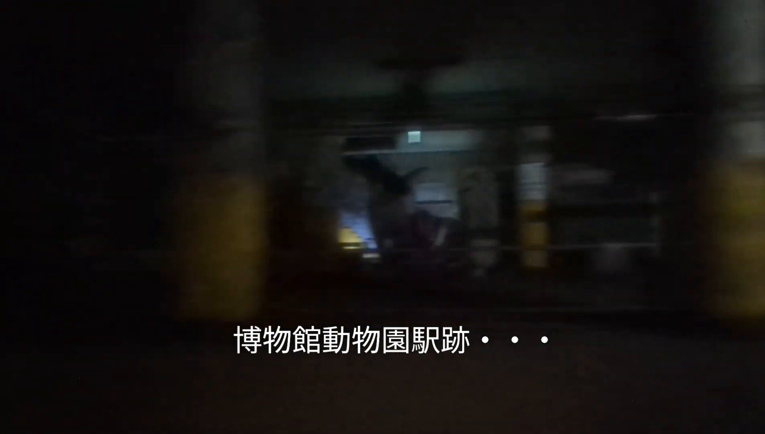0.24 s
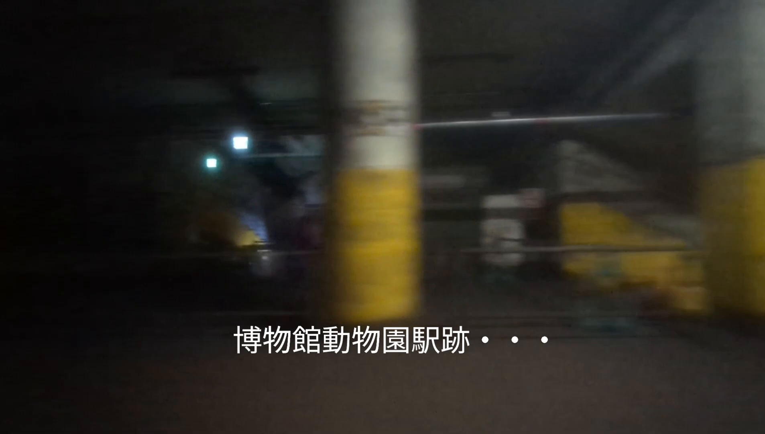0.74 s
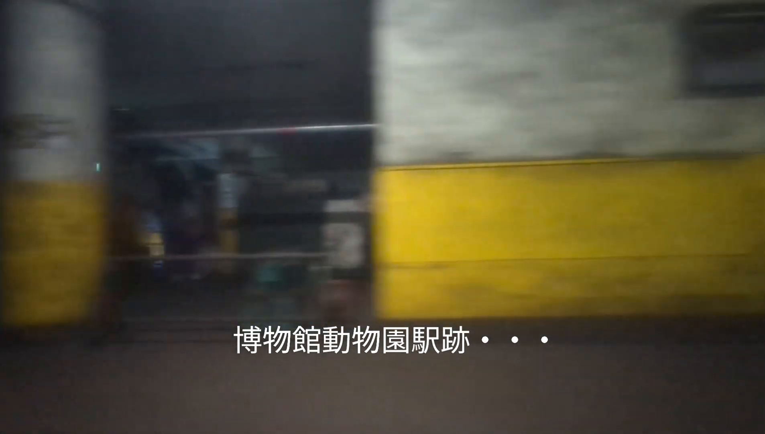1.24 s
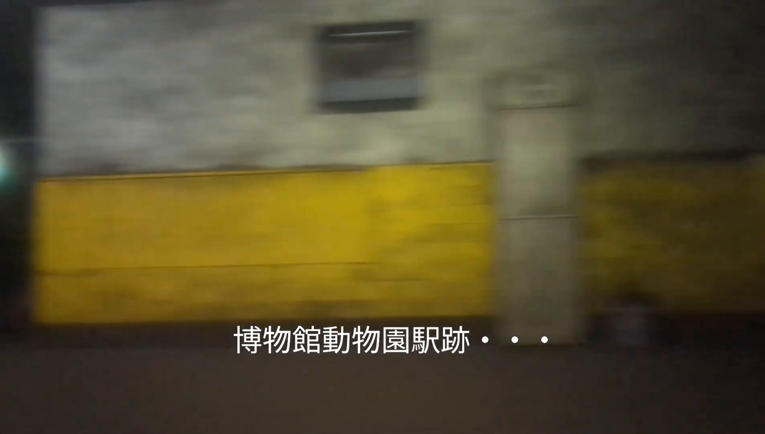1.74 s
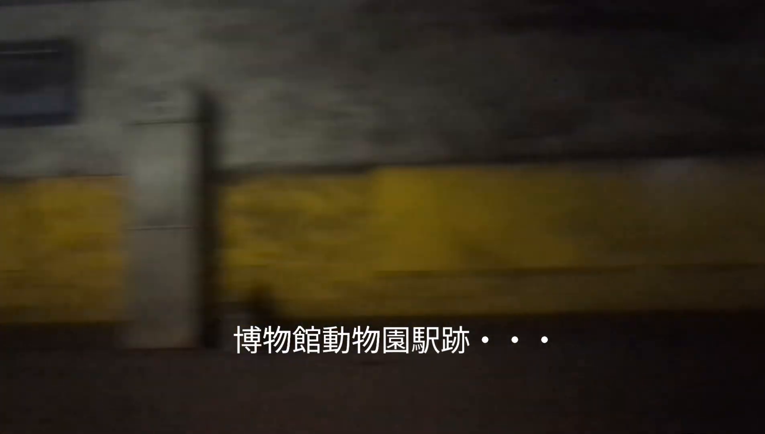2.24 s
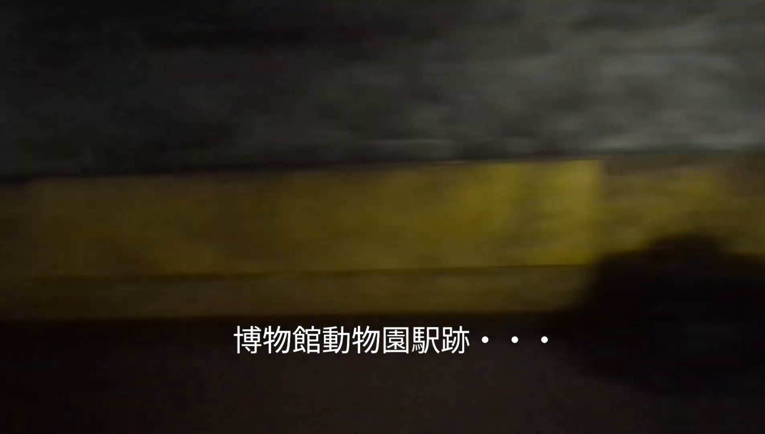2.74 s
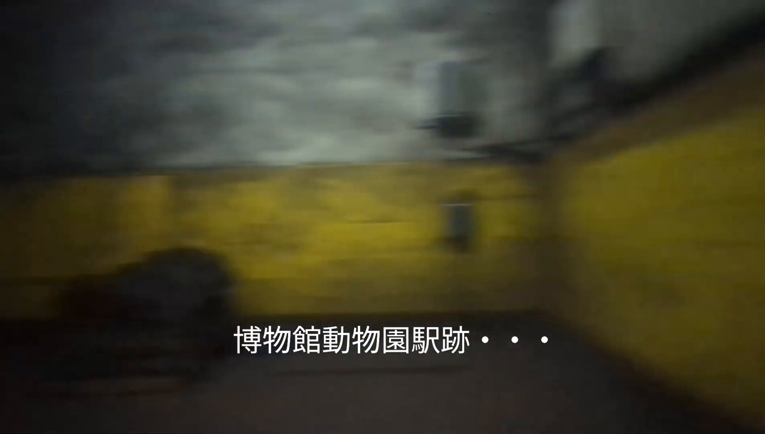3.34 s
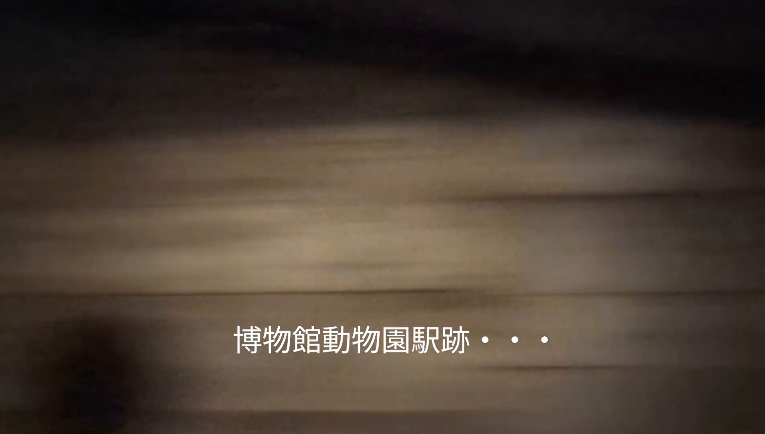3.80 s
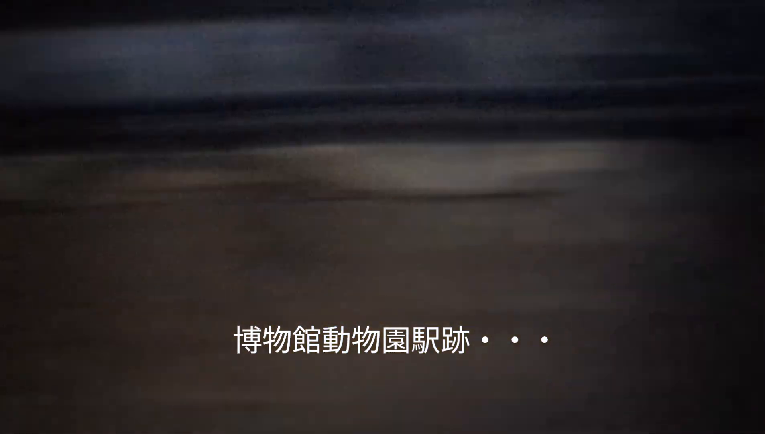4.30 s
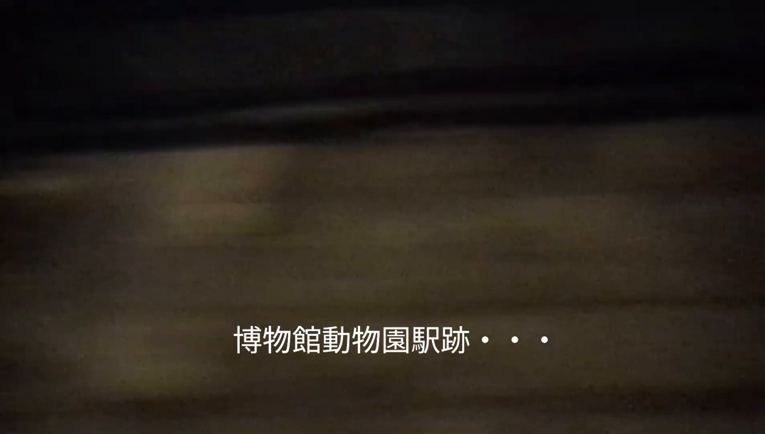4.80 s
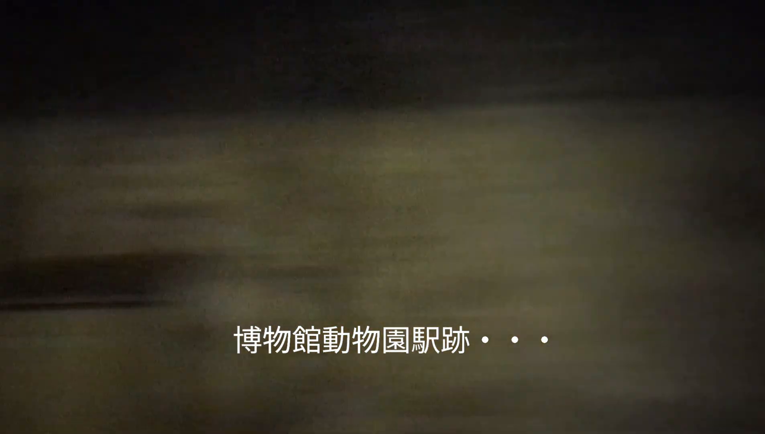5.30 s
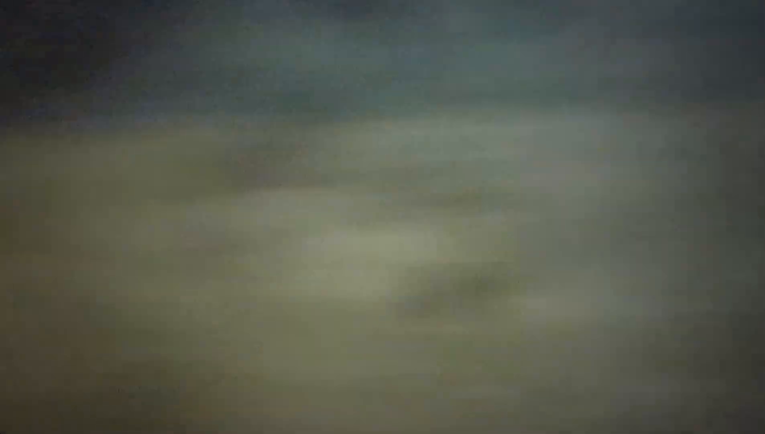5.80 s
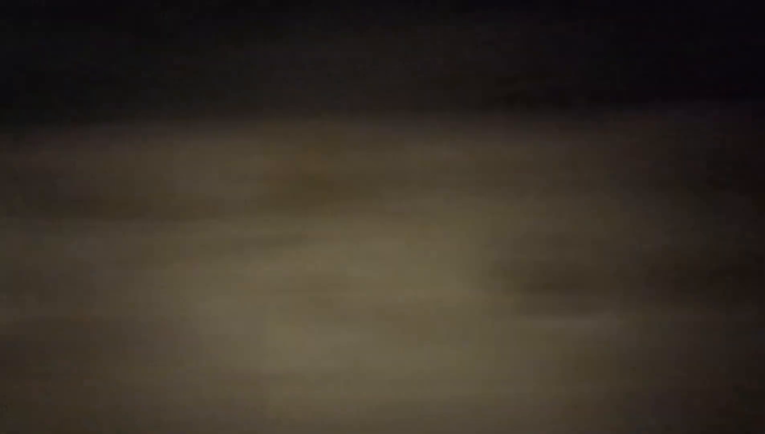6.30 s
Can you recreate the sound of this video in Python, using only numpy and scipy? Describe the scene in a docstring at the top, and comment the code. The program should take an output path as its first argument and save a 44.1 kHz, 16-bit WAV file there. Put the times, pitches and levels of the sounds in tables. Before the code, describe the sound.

Heard by the window inside an underground train car, a deep boom throbs and wavers under steady wheel rumble and mid roar. Around two seconds a cluster of thumps and rail-joint clatter surges with a hissing rush. It settles, then grows rougher, with drumming floor, tiny trim ticks and two strong clattering joints near the end. Close, enclosed stereo, bass-heavy with very little treble.

```python
"""Train car in a tunnel

The car body booms as a low tone that swells and wavers in pitch, in wider noise.
The wheels rumble, roar and hiss as shaped noise.
Rail joints crack, ping and clatter; bumps thump, the floor drums and wheel flanges squeal briefly.
Bright hiss returns from the tunnel wall, and loose trim crackles and ticks faintly.
Noise layers follow level curves or event times and are spread over two ears."""
import sys
import numpy as np
from scipy import signal
from scipy.fft import rfft, irfft, next_fast_len
from scipy.io import wavfile
from scipy.ndimage import uniform_filter1d

SR = 44100
rng = np.random.default_rng(int(sys.argv[2]) if len(sys.argv) > 2 else 0)


def master_out(mix):
    """Clip the mix to full scale and print it as 16-bit PCM to the path in sys.argv[1]."""
    frames = np.transpose(np.atleast_2d(mix))
    ceiling = np.clip(frames, -1, 1)
    pcm = np.round(ceiling * 32767).astype(np.int16)
    wavfile.write(sys.argv[1], SR, pcm)


N = 288833
TIME = np.arange(N) / SR
FFT_SIZE = next_fast_len(N, True)
FREQS = np.maximum(np.fft.rfftfreq(FFT_SIZE, 1 / SR), 1)
# rough, uneven contact makes rolling noise and clatter grainy (rms dB, rate)
GRIT_DB, GRITS_PER_S = 1.5, 90

# body shake on the springs, before tone and noise offsets: time_s, level_db
BODY_SHAKE = [(0, -22.5), (0.55, -22), (0.77, -25.5), (0.97, -21.5), (1.85, -23), (2.0, -29.5), (2.17, -20),
              (2.5, -22.5), (2.98, -25.5), (3.15, -20.5), (3.29, -21.5), (3.45, -19.5), (4.05, -19.5),
              (4.75, -21), (5.1, -20), (5.6, -20.5), (6.2, -20), (6.5, -20)]
# resonances and dead spots of the car's panels: centre_hz, width_hz, lift_db
PANEL_MODES = [(104, 6.6, -0.5), (119, 33, 4.5), (141, 16, 0), (167, 9.6, -4.5), (200.7, 32, 4.5),
               (242, 14, -2.5), (379, 21, -3.5), (410.5, 15, 4.5), (475, 7.8, -2.5), (494.4, 44, 6.5),
               (504, 20, -1), (560.7, 18, 6.5), (670, 52, 4), (787, 8.8, 4.5), (890, 40, -5.5),
               (920, 32, 3), (1229, 59, 4.5), (1330, 50, 7), (1505, 42, -2), (1534, 85, 3), (1800, 210, 0),
               (1976, 78, -5.5)]


def from_db(db):
    """Decibels to gain."""
    return 10 ** (np.asarray(db) / 20)


def rms_one(x):
    """Scale to an rms of 1."""
    return x / np.sqrt(np.mean(x ** 2) + 1e-20)


def in_time(rows):
    """Each column of a curve, interpolated at every sample."""
    s, *columns = np.transpose(rows)
    return [np.interp(TIME, s, column) for column in columns]


def over_hz(points):
    """(Hz, value) points joined on a log-frequency axis."""
    hz, value = np.transpose(points)
    return np.interp(np.log(FREQS), np.log(hz), value)


def colour(spectrum, resonances=()):
    """Gain of a spectrum that falls steeply past its ends, lifted at each resonance."""
    lift_db = sum(db / (1 + (2 * (FREQS - hz) / width_hz) ** 2) for hz, width_hz, db in resonances)
    lowest_hz, highest_hz = spectrum[0][0], spectrum[-1][0]
    skirts = np.minimum(1, np.minimum(FREQS / lowest_hz, highest_hz / FREQS)) ** 4
    return from_db(over_hz(spectrum) + lift_db) * skirts


def in_car(forces, gain):
    """Two unrelated forces through a colour: long waves reach both ears alike, short ones diffusely."""
    # sound field: pitch_hz, left_right_correlation
    likeness = [(60, .987), (130, .955), (260, .93), (330, .75), (460, .12), (630, .48), (900, .06),
                (1200, -.05), (1370, -.5), (1680, .35), (2100, .02), (5000, .05), (9000, .4)]
    # sound field: pitch_hz, left_minus_right_db
    balance = [(110, 0.6), (200, 0), (350, 1.5), (440, 3), (600, -0.5), (900, 1), (1420, 6.5), (1900, 0),
               (2400, -0.5), (2800, 6), (3500, -1.5), (9000, -1)]
    mid, side = rfft(forces, FFT_SIZE) * gain
    alike = np.clip(over_hz(likeness), -.999, .999)
    sign = np.array([[1], [-1]])  # left, right
    ears = np.sqrt(1 + alike) * mid + sign * np.sqrt(1 - alike) * side
    ears = ears * from_db(sign * over_hz(balance) / 2)
    return irfft(ears, FFT_SIZE)[:, :N]


def rolling(spectrum, resonances=()):
    """Vibration driven by random roughness: coloured noise in both ears, rms 1."""
    return rms_one(in_car(rng.standard_normal((2, N)), colour(spectrum, resonances)))


def evened(x, span_s):
    """The same vibration with its swells slower than span_s taken out."""
    power = uniform_filter1d(np.mean(x ** 2, axis=0), max(int(span_s * SR), 1))
    return x / np.sqrt(power + 1e-9)


def drift(per_s):
    """A smooth random wander, rms 1, with little movement faster than per_s."""
    spectrum = rfft(rng.standard_normal(N), FFT_SIZE) * np.exp(-(FREQS / per_s) ** 2)
    return rms_one(irfft(spectrum, FFT_SIZE)[:N])


def grit():
    """Random gain of grainy contact."""
    return from_db(GRIT_DB * drift(GRITS_PER_S))


def blow(start_s, rise_s, t60_s):
    """Envelope of a blow: a quick rise, then an exponential decay."""
    age_s = np.maximum(TIME - start_s, 0)
    return (1 - np.exp(-age_s / rise_s)) * from_db(-60 * age_s / t60_s)


def swells(rows):
    """Sum of bell-shaped swells: centre_s, half_width_s, level_db."""
    return sum(from_db(db) * np.exp(-((TIME - s) / width_s) ** 2) for s, width_s, db in rows)


def body_boom():
    """The car's lowest resonance: a low tone throbs, swells and wavers in pitch, in wider noise."""
    # swells of the low tone, levels before swell_db: centre_s, crest_db, half_width_s, pitch_hz
    boom_swells = [(0.309, -21, 0.022, 67.83), (0.49, -21.5, 0.054, 60.3), (0.68, -19.5, 0.016, 66.2),
                   (0.86, -14.5, 0.024, 56.63), (1.15, -16, 0.013, 66.5), (1.329, -18.5, 0.034, 56.9),
                   (1.42, -19.5, 0.022, 62.55), (1.55, -20, 0.069, 54.7), (1.72, -18, 0.023, 59.6),
                   (1.9, -18.5, 0.022, 58.46), (2.101, -16, 0.038, 60), (2.3, -21, 0.053, 71.8),
                   (2.5, -22, .045, 65.8), (3.2, -18, 0.028, 72.3), (3.36, -18.5, 0.026, 63.41),
                   (3.44, -15.5, 0.036, 60.1), (3.54, -14.5, 0.025, 57), (3.64, -14, 0.028, 54.8),
                   (3.75, -17.5, .02, 67.04), (3.85, -18, 0.04, 59.8), (4.04, -18, 0.07, 59.96),
                   (4.22, -17.5, 0.022, 69.8), (4.44, -20, 0.029, 66), (4.61, -15.5, 0.024, 62.9),
                   (4.925, -16, 0.059, 64), (5.07, -18, 0.027, 69.4), (5.21, -15.5, 0.044, 67),
                   (5.399, -18, 0.028, 66), (5.48, -16, 0.019, 68), (5.57, -17, 0.05, 58.7),
                   (5.72, -14, 0.027, 62.35), (5.88, -17.5, 0.039, 62.98), (6.04, -20.5, 0.031, 61),
                   (6.18, -18.5, 0.034, 67.6), (6.3, -23.5, 0.033, 62)]
    # noise around the tone: pitch_hz, relative_db per Hz
    boom_spectrum = [(22, -32.5), (31, -27.5), (40, -11.5), (51, 1), (61, -13), (70, -7), (80, -2),
                     (97, -6), (110, -22), (170, -48.5)]
    tone_db, swell_db, noise_db = -6.0, 1.3, -4
    throb_db, throbs_per_s = 2.5, 7.6
    throb_limit_db = 10.5  # upper limit of the random throb, hardly ever reached
    wander_hz, wanders_per_s = 1.201, 3.17
    lowest_hz, highest_hz = 35, 100

    shake_db, = in_time(BODY_SHAKE)
    sway = from_db(shake_db + np.minimum(throb_db * drift(throbs_per_s), throb_limit_db))
    swell = swells([(s, width_s, db) for s, db, width_s, _ in boom_swells])
    pitch_hz = in_time(boom_swells)[-1] + wander_hz * drift(wanders_per_s)
    tone = np.sqrt(2) * np.sin(2 * np.pi * np.cumsum(pitch_hz) / SR)
    boom = np.maximum(from_db(tone_db) * sway, from_db(swell_db) * swell) * tone
    boom = boom + from_db(shake_db + noise_db) * evened(rolling(boom_spectrum), span_s=0.11)
    # panels radiate little on either side of the resonance
    radiation = 1 / np.sqrt((1 + (lowest_hz / FREQS) ** 8) * (1 + (FREQS / highest_hz) ** 16))
    return irfft(rfft(boom, FFT_SIZE) * radiation, FFT_SIZE)[:, :N]


def wheels():
    """Rolling noise of wheel on rail: floor rumble, mid roar and the hiss of ringing steel."""
    # rail roughness heard as levels: time_s, roar_db, hiss_db
    track = [(0, -41, -69), (0.25, -39, -64), (0.55, -39.5, -65.5), (0.78, -40.5, -66.5), (1.6, -41, -66.5),
             (1.93, -36.5, -61), (2.05, -40, -62), (2.27, -35, -54), (2.44, -39, -57.5),
             (2.72, -41.5, -64.5), (2.82, -39.5, -60), (3.5, -39, -63), (3.99, -36, -55.5),
             (4.12, -38.5, -61), (4.28, -37.5, -54), (4.55, -38.5, -60), (4.9, -37.5, -59),
             (5.03, -36, -52), (5.2, -37.5, -57.5), (5.7, -36.5, -56.5), (5.98, -38, -57),
             (6.5, -40, -59.5)]
    # spectra: pitch_hz, relative_db per Hz
    rumble_spectrum = [(80, -22.5), (125, -1), (165, -1.5), (210, -1.5), (310, -0.5), (380, -4.5),
                       (520, -6.5), (650, -13.5), (850, -27), (1500, -53)]
    roar_spectrum = [(400, -24.5), (700, 0), (950, 4), (1150, -2.5), (1500, -4), (1850, -2), (2100, -9.5),
                     (2600, -19), (3200, -24), (5000, -52.5)]
    hiss_spectrum = [(1800, -12), (2600, 0), (3200, 0.5), (3900, -4), (4130, -6), (4500, -10.5),
                     (5300, -11.5), (5900, -25), (6800, -24.5), (7600, -28.5), (12000, -34.5)]
    # ringing of wheels and rails: centre_hz, width_hz, lift_db
    steel_modes = [(3250, 66, -7), (3490, 190, 4.5), (3650, 45, 8.5), (3940, 92, 5), (4300, 59, -4),
                   (4306, 68, 10.5), (4800, 140, 2.5)]
    usual_roar_db, usual_boom_db, usual_rumble_db = -39, -22, -30  # on ordinary track
    rumble_per_roar, rumble_per_boom = 1, 0.12  # dB per dB
    flaw_db, flaws_per_s = 0.77, 6.9  # small rail flaws swell all three layers together

    roar_db, hiss_db = in_time(track)
    shake_db, = in_time(BODY_SHAKE)
    rumble_db = usual_rumble_db + rumble_per_roar * (roar_db - usual_roar_db)
    rumble_db = rumble_db + rumble_per_boom * (shake_db - usual_boom_db)
    rumble = from_db(rumble_db) * evened(rolling(rumble_spectrum, PANEL_MODES), span_s=0.27)
    roar = from_db(roar_db) * evened(rolling(roar_spectrum, PANEL_MODES), span_s=0.26)
    hiss = from_db(hiss_db) * rolling(hiss_spectrum, steel_modes) * grit()
    return (rumble + roar + hiss) * from_db(flaw_db * drift(flaws_per_s))


def roar_surges():
    """The wheels' roar swells into a hollow, grainy rush and sinks back."""
    # centre_s, half_width_s, level_db
    surges = [(1.93, 0.044, -37.5), (2.29, 0.09, -36), (5.05, 0.062, -38), (6.09, 0.062, -41.5)]
    # pitch_hz, relative_db per Hz
    surge_spectrum = [(600, -5), (950, 5), (1500, -3.5), (1900, -10.5), (2400, -19.5), (3300, -26.5),
                      (4300, -23), (5500, -35)]
    # panel resonance excited: centre_hz, width_hz, lift_db
    surge_modes = [(1270, 120, 9.3)]
    return swells(surges) * grit() * evened(rolling(surge_spectrum, surge_modes), span_s=0.06)


def rail_joints():
    """Wheels on joints: a steel crack and ping, a ringing floor and a swelling clatter."""
    # start_s, clatter_db, crack_db, floor_ring_db, clatter_rise_s, clatter_t60_s, crack_t60_s, ping_hz
    joints = [(2.105, -32.5, -51.5, -22.5, .012, 0.4, 0.18, 2330),
              (2.2, -30, -66, -42, 0.035, 0.33, 0.3, 2300),
              (5.708, -25.5, -41.5, -35, 0.027, 0.44, 0.37, 3058),
              (6.034, -24.5, -37, -33, 0.024, 0.61, 0.46, 3207)]
    # spectra: pitch_hz, relative_db per Hz
    clatter_spectrum = [(300, -20.5), (650, 10.5), (1300, 1.5), (2000, 1), (2700, -14.5), (3500, -13.5),
                        (5000, -34.5), (8000, -36.5), (15000, -50)]
    crack_spectrum = [(1600, -13), (2150, 4.5), (2650, -4), (3400, -10.5), (5000, -19.5), (8000, -33),
                      (15000, -53.5)]
    ring_spectrum = [(430, -25), (480, -14.5), (520, 4), (555, -5.5), (620, -5)]
    crack_rise_share = 0.22  # of the clatter's rise time
    ping_db = 4  # relative to crack_db

    clatter = crack = ring = pings = 0
    for s, clatter_db, crack_db, ring_db, rise_s, clatter_t60_s, crack_t60_s, ping_hz in joints:
        clatter += from_db(clatter_db) * blow(s, rise_s, clatter_t60_s)
        crack += from_db(crack_db) * blow(s, crack_rise_share * rise_s, crack_t60_s)
        ring += from_db(ring_db) * blow(s, rise_s=0.02, t60_s=0.43)
        pings += from_db(crack_db + ping_db) * rail_ping(s, ping_hz)
    clatter = grit() * clatter * rolling(clatter_spectrum, PANEL_MODES)
    crack = crack * rolling(crack_spectrum)
    ring = ring * evened(rolling(ring_spectrum), span_s=0.04)
    return clatter + crack + pings + ring


def rail_ping(start_s, start_hz):
    """High bending waves run fastest along the rail, so a blow arrives as a short falling ping."""
    octave_s, blur_hz = .045, 72  # time to fall the first octave; rms pitch unsteadiness
    age_s = np.maximum(TIME - start_s, 0)
    pitch_hz = start_hz / (1 + age_s / octave_s) + blur_hz * drift(270)
    return blow(start_s, rise_s=0.0074, t60_s=0.069) * np.sin(2 * np.pi * np.cumsum(pitch_hz) / SR)


def bumps():
    """Dips in the track thump dully through the suspension."""
    # start_s, level_db
    heavy_bumps = [(0.601, -24.5), (1.81, -19), (1.94, -27), (2.16, -25.5), (2.212, -18.5), (2.288, -22.5),
                   (2.535, -26), (3.6, -22.5), (4.229, -25), (4.581, -24), (5.0, -27), (5.13, -23.5),
                   (5.595, -20), (5.801, -23.5)]
    # pitch_hz, relative_db per Hz
    thump_spectrum = [(110, -4), (145, -7), (205, -2), (290, -9), (400, -13.5), (700, -34.5)]
    push = sum(from_db(db) * blow(s, rise_s=0.015, t60_s=0.49) for s, db in heavy_bumps)
    return push * evened(rolling(thump_spectrum, PANEL_MODES), span_s=0.059)


def floor_drumming():
    """Short rough patches of rail make the floor panels drum in swells."""
    # centre_s, half_width_s, level_db
    rough_patches = [(0.58, 0.075, -34), (1.87, 0.054, -35), (2.28, .08, -35.5), (2.81, 0.073, -35.5),
                     (3.83, 0.046, -29.5), (3.99, 0.04, -37), (4.24, 0.057, -34), (5.13, 0.13, -35.5),
                     (5.33, 0.031, -27.5), (5.51, 0.034, -33), (5.679, 0.071, -33), (5.85, 0.07, -33.5),
                     (6.04, 0.078, -33)]
    # pitch_hz, relative_db per Hz
    drum_spectrum = [(330, -18), (420, -4.5), (520, 3.5), (620, -5), (760, -5.5)]
    return swells(rough_patches) * evened(rolling(drum_spectrum, PANEL_MODES), span_s=0.016)


def flange_squeals():
    """A flange rubs the rail and a wheel mode swells up: narrow noise whistles, broad noise scrapes."""
    # one row per squeal: centre_s, length_s, pitch_hz, width_hz, level_db
    squeals = [(0.562, .04, 3700, 59, -64), (1.91, .12, 3700, 500, -63), (2.266, 0.15, 3700, 380, -56),
               (2.845, 0.17, 3995, 45, -64.5), (2.82, .16, 3400, 70, -65.5), (3.115, 0.11, 3980, 45, -64),
               (3.18, 0.13, 3460, 80, -65), (4.879, 0.019, 3440, 30, -52), (5.035, .2, 3700, 600, -61),
               (5.02, .14, 4270, 90, -61)]
    out = np.zeros((2, N))
    for s, length_s, hz, width_hz, db in squeals:
        swell = np.cos(np.pi * np.clip((TIME - s) / length_s, -.5, .5))
        resonance = 1 / (1 + (2 * (FREQS - hz) / width_hz) ** 2)
        mode = in_car(rng.standard_normal((2, N)), resonance)
        out += from_db(db) * swell * evened(rms_one(mode), span_s=.02)
    return out


def wall_echo():
    """The tunnel wall closes in and draws back, returning bright wheel hiss to the window."""
    # pitch_hz, relative_db per Hz
    wall_spectrum = [(1800, -14.5), (2200, 1.5), (2700, 2), (3200, -18.5), (4200, -21), (5200, -20),
                     (5900, -28.5), (6800, -22), (7600, -36)]
    nearest_s, nearest_db = 5.75, -53.5
    rise_db_per_s, fall_db_per_s = 16.5, 4
    past_s = TIME - nearest_s
    loss_db = np.maximum(-rise_db_per_s * past_s, fall_db_per_s * past_s)
    return from_db(nearest_db - loss_db) * rolling(wall_spectrum)


def trim_chatter():
    """Loose fittings crackle with clumps of tiny contacts of uneven size."""
    # crackle level: time_s, level_db
    rattle = [(0, -87), (2.15, -97.5), (2.29, -72), (2.42, -93), (3.6, -86.5), (3.95, -79), (4.12, -84.5),
              (4.28, -77), (4.55, -83.5), (5.1, -74.5), (5.72, -71), (5.9, -75.5), (6.5, -83.5)]
    # pitch_hz, relative_db per Hz
    trim_spectrum = [(2500, -11), (4000, -4), (5900, 0.5), (6800, 7), (7400, -7.5), (8700, 2.5),
                     (9900, -13.5), (11500, -1), (15000, -7.5)]
    contacts_per_s, spread_db = 600, 3  # in each of the two forces; scale of the exponential size draw
    clump_db, clumps_per_s = -1.5, 35
    rattle_db, = in_time(rattle)
    sizes = from_db(spread_db * np.minimum(rng.exponential(1, (2, N)), 4))
    sizes = sizes * rng.choice([-1, 1], (2, N))
    touching = rng.random((2, N)) < contacts_per_s / SR
    contacts = sizes * touching * from_db(clump_db * drift(clumps_per_s))
    return from_db(rattle_db) * rms_one(in_car(contacts, colour(trim_spectrum)))


def trim_ticks():
    """Harder contacts of the trim: a dry tick and its short echo in the car."""
    # start_s, level_db
    ticks = [(2.2726, -62), (2.6283, -63.5), (2.7859, -65), (3.8375, -62), (3.9279, -59), (4.0218, -62),
             (4.1446, -62), (4.1927, -62), (4.219, -57.5), (4.2825, -54), (4.425, -59), (4.462, -62),
             (4.6729, -60), (4.7646, -49), (5.1461, -50.5), (5.2506, -57), (5.3138, -61), (5.3872, -54),
             (5.472, -59), (5.5533, -64), (5.5797, -61), (5.6398, -59), (5.681, -57), (5.896, -62),
             (6.1193, -62), (6.1746, -54)]
    # pitch_hz, relative_db per Hz
    tick_spectrum = [(2500, 3), (4000, 6.5), (6700, 2.5), (7500, -2.5), (8700, 0), (9900, -9),
                     (11500, -3.5), (15000, -9.5)]
    tail_db = -19  # relative to the dry tick
    strikes = 0
    for s, db in ticks:
        dry_tick = blow(s, rise_s=0.00017, t60_s=0.032)
        tail = from_db(tail_db) * blow(s, rise_s=0.0036, t60_s=0.1)
        strikes += from_db(db) * (dry_tick + tail)
    return strikes * rolling(tick_spectrum)


def scene():
    """Everything heard from a place at the window."""
    running_gear = body_boom() + wheels() + roar_surges() + rail_joints()
    running_gear = running_gear + bumps() + floor_drumming() + flange_squeals()
    return running_gear + wall_echo() + trim_chatter() + trim_ticks()


def record(dry):
    """Fade in over 5 ms to avoid a click, then cut the top steeply at 15.5 kHz."""
    low_pass = signal.ellip(10, .1, 80, 15500, fs=SR, output="sos")
    return signal.sosfilt(low_pass, dry * np.minimum(TIME / .005, 1))


dry = scene()
out = record(dry)
master_out(out)
```